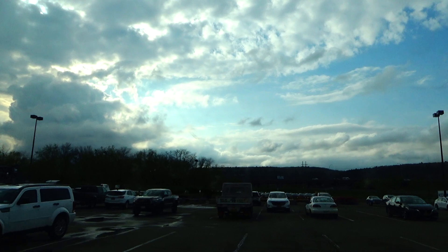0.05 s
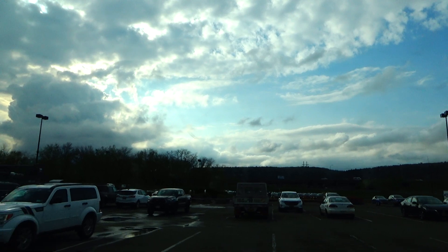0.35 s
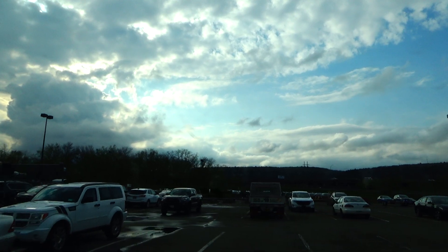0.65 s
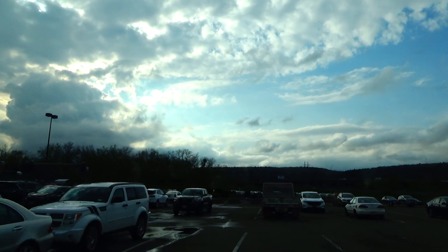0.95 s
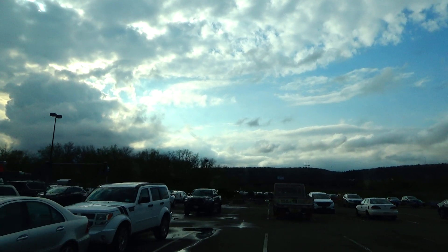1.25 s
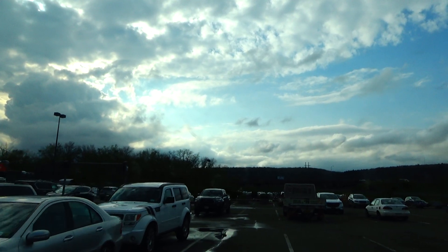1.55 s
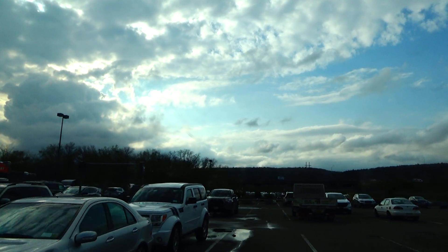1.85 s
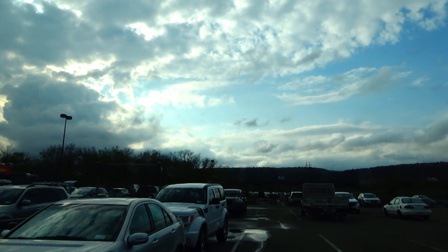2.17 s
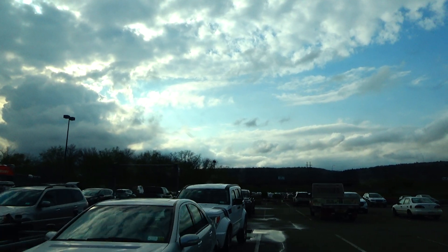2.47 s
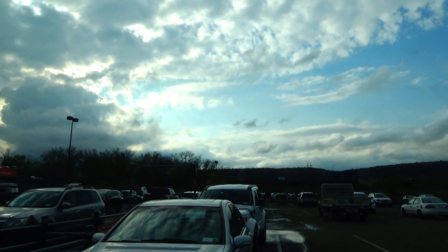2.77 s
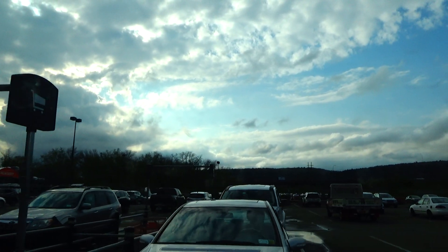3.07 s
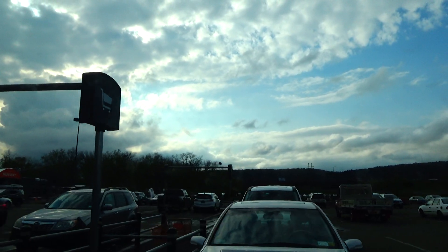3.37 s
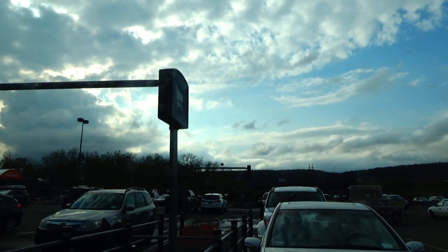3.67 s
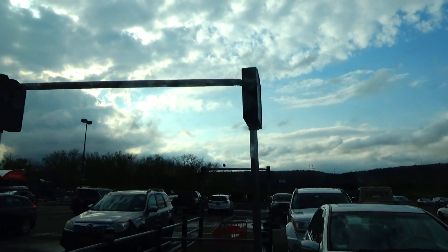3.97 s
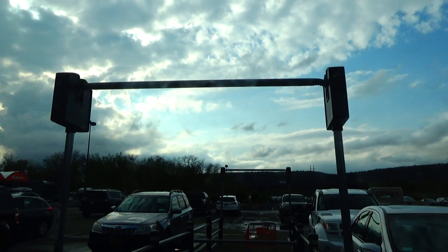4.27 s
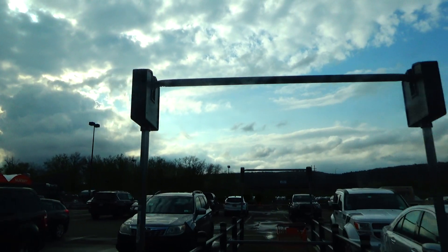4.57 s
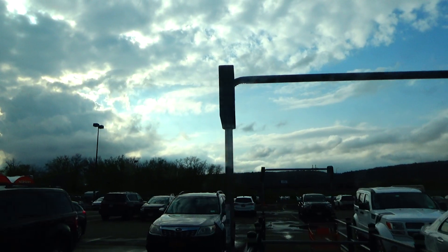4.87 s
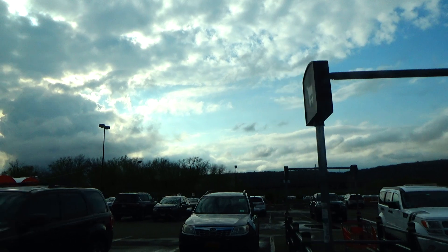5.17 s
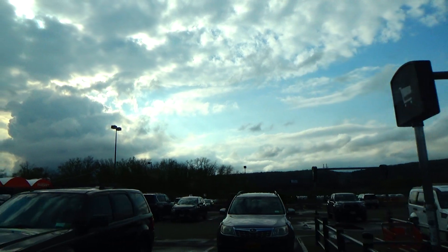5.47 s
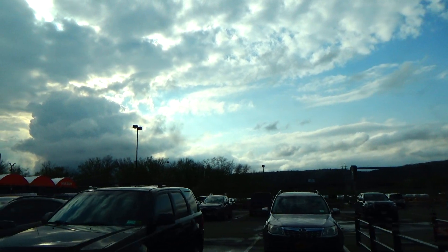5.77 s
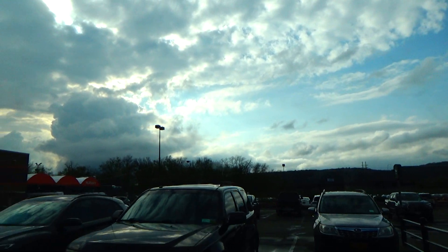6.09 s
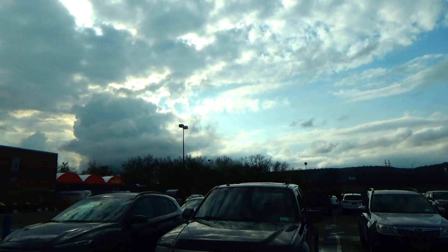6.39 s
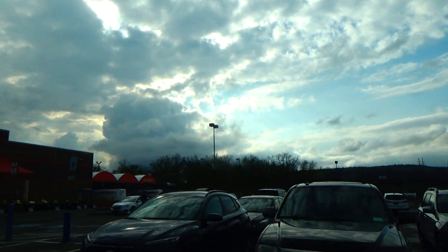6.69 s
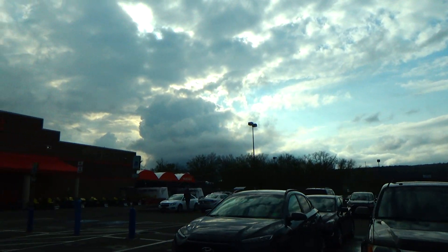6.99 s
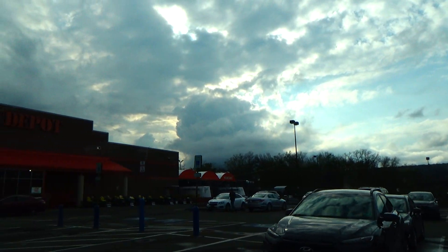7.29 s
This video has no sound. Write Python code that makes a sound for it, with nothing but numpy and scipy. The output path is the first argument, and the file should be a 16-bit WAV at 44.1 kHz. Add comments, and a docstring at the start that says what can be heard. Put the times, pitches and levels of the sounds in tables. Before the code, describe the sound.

A car rolls slowly over uneven asphalt, heard from inside: low road rumble and engine hum, with dull bumps and light plastic clacks.

```python
"""Inside a car rolling slowly across a parking lot.
Tyres on uneven asphalt shake the cabin's air modes over a low engine hum and a faint hiss.
Bumps make the body boom and heave on its springs; jolts set a trim panel droning.
Close by, loose plastic clacks and scrapes, a small catch ticks, and cloth rustles now and then."""
import sys
import numpy as np
from scipy import signal
from scipy.fft import rfft, irfft, next_fast_len
from scipy.io import wavfile

SR = 44100
rng = np.random.default_rng(int(sys.argv[2]) if len(sys.argv) > 2 else 0)


def master_out(mix):
    """Clip the mix to full scale and print it as 16-bit PCM to the path in sys.argv[1]."""
    frames = np.transpose(np.atleast_2d(mix))
    ceiling = np.clip(frames, -1, 1)
    pcm = np.round(ceiling * 32767).astype(np.int16)
    wavfile.write(sys.argv[1], SR, pcm)


N = 323694
TIME_S, BINS_HZ = np.arange(N) / SR, np.fft.rfftfreq(N, 1 / SR)


# rumble along the way: t/s, level/dB
ROAD_LEVEL = [(0, -24.5), (.55, -28), (.66, -30), (1.0, -28.5), (1.2, -28), (1.5, -30), (1.75, -34.5),
              (2.15, -36.5), (2.35, -34), (2.6, -33.5), (3.3, -32), (3.5, -37.5), (3.65, -33),
              (4.25, -28.5), (4.48, -34), (4.6, -36), (5.2, -29), (5.75, -32.5), (6.2, -27.5), (6.75, -28),
              (7.34, -30)]
# bumps lifting the rumble: t/s, level/dB, rise/s, fall/s
BUMPS = [(.8, -24.5, 0.064, 0.12), (4.62, -26, 0.034, 0.088), (4.98, -24.5, 0.09, 0.022)]
# body rumble: f/Hz, level/dB
RUMBLE_SPECTRUM = [(9, -44), (18, -4), (45, -13), (60, -3.5), (90, -5), (112, -8), (146, -13.5),
                   (200, -16.5), (330, -30.5), (700, -70)]
# tyre roar: f/Hz, level/dB
ROAR_SPECTRUM = [(70, -42), (160, 0), (207, -2), (260, 1.5), (350, -5), (500, -7), (700, -11), (930, -13),
                 (1080, -18), (1700, -25), (2500, -31.5), (4000, -39), (9000, -56)]
# air, panel and tyre resonances, plus a narrow engine hum line at 126 Hz: f/Hz, width/Hz, lift/dB
CABIN_MODES = [(43, 8.8, 1), (88.2, 28, 5), (126, 1.2, 0.5), (160, 35, 1.5), (178.8, 9.7, 4.5),
               (255, 34, 3), (284, 40, 2.5), (442, 6.5, 8.5), (655, 28, 6), (865, 15, 3), (1302, 40, 6)]

def road(rumble_db=-0.24, roar_db=-30.5, roar_follows=0.16, lumpy_db=1.09):
    """Uneven asphalt shakes the body; the tyres' roar follows only a little. Both ring the cabin."""
    cabin_db = resonance_db(CABIN_MODES, BINS_HZ)
    smooth_db = np.interp(TIME_S, *np.transpose(ROAD_LEVEL))
    surface_db = 20 * np.log10(np.hypot(amp(smooth_db), swells(BUMPS)))
    rumble = cabin_noise(lookup(RUMBLE_SPECTRUM) + cabin_db)
    roar = cabin_noise(lookup(ROAR_SPECTRUM) + cabin_db)
    roar_gain = amp(roar_follows * surface_db + roar_db + lumpy_db * drift(rate_hz=14.7))
    return rumble * amp(surface_db + rumble_db) + roar * roar_gain


# body booms and low knocks under the louder clacks: t/s, level/dB, f/Hz, swell/s, decay/s
THUMPS = [(-.012, -9.5, 172.4, 0.0096, 0.019), (.01, -23, 371, .012, 0.0069),
          (0.209, -21, 125, 0.013, 0.012), (0.733, -32, 450, 0.0049, 0.025),
          (.799, -16.5, 89, 0.036, 0.015), (1.539, -33.5, 720, 0.0055, .005),
          (1.539, -22.5, 110, 0.015, 0.015), (2.447, -26.5, 393, 0.0091, .012),
          (2.978, -25, 62, 0.017, .009), (4.22, -11.5, 170.8, 0.024, 0.021),
          (4.285, -23.5, 440, 0.0031, 0.0017), (4.443, -28, 312, 0.0029, 0.0055),
          (4.94, -38, 166, 0.049, 0.024), (5.475, -28.5, 465, 0.0083, 0.0029),
          (6.16, -28, 495, 0.0022, .012), (6.992, -33.5, 665, 0.0058, 0.028)]

def thumps(roughness=0.14, left_db=1.4):
    """Each jolt swells one boom of the body, which then dies away; the louder plastic knocks get a low, short
    boom of their own the same way."""
    out, t = np.zeros((2, N)), np.arange(SR // 2) / SR
    for start_s, db, hz, swell_s, decay_s in THUMPS:
        rising = np.sin(np.pi / 2 * t / swell_s) ** 2
        falling = np.exp(-np.maximum(t - swell_s, 0) / decay_s)
        envelope = np.where(t < swell_s, rising, falling)
        band = signal.butter(2, [hz / 2, hz * 2], "bandpass", fs=SR, output="sos")
        grit = unit(signal.sosfilt(band, rng.standard_normal((2, len(t)))))
        boom = np.sin(2 * np.pi * hz * t) + roughness * grit
        add(out, start_s, amp(db) * envelope * boom * amp([[left_db], [-left_db]]))
    return out


# body heaves: t/s, level/dB, rise/s, fall/s
HEAVES = [(.76, -23, 0.018, 0.12), (4.62, -29.5, 0.048, .1), (5.52, -27.5, 0.068, 0.17)]
# deep thud: f/Hz, level/dB
HEAVE_SPECTRUM = [(10, -18), (22, 11), (32, -10.5), (50, -11.5), (80, -19), (200, -63.5)]

def heave():
    """A dip in the asphalt rocks the whole body on its springs: a deep thud."""
    return cabin_noise(lookup(HEAVE_SPECTRUM)) * swells(HEAVES)


# panel jolts: t/s, level/dB, rise/s, fall/s
PANEL_JOLTS = [(.015, -26, 0.05, 0.11), (.41, -26, 0.014, 0.031), (.75, -25.5, .02, 0.021),
               (6.32, -28.5, 0.11, 0.13)]

def panel(mode_hz=272, half_width_hz=39):
    """A trim panel drones roughly in its one resonance when the road jolts it."""
    spectrum_db = -20 * np.log10(1 + ((BINS_HZ - mode_hz) / half_width_hz) ** 2)
    return cabin_noise(spectrum_db) * swells(PANEL_JOLTS)


# plastic contacts: t/s, level/dB, brightness/dB, hollowness/dB
CLACKS = [(.167, -41, 21, 0), (0.22, -34, 7, 18), (0.73, -28.5, -8, -9), (.742, -42, 4, 11),
          (1.3595, -36, -6, 0), (1.389, -42, 11, 3), (1.488, -39, -8, 2), (1.542, -31, -8, 2),
          (1.58, -42, -2, 0), (2.4487, -20, 2, 2), (2.456, -23, 4, -3), (2.4585, -23.5, 8, 12),
          (2.807, -35.5, -7, 4), (2.961, -30.5, 5, 7), (2.9902, -31, 4, -2), (3.855, -39, 7.5, -5),
          (4.058, -32.5, 2.5, 9), (4.15, -38.5, 10, 0), (4.2572, -27, 3.5, 7), (4.4465, -22.5, 0, 2),
          (4.653, -37, 14, 0), (4.969, -33, 0, -4), (5.143, -37, -7, 8), (5.154, -38, 5, -3),
          (6.1609, -15.5, -3, -2), (6.181, -23, 1.5, -1), (6.198, -35, 0, -2), (6.519, -31.5, 1, 8),
          (6.971, -37, 14, -2), (7.001, -32.5, -9, 1), (7.077, -44, 18, 0), (7.116, -40, 9, 2)]
# broad shape of a clack: f/Hz, level/dB
CLACK_SPECTRUM = [(100, 8.5), (330, 14), (750, 4), (1150, 2), (1600, 4.5), (2300, 3.5), (3200, 2),
                  (6200, -2.5), (7800, -12.5), (9700, -15.5), (11200, -20), (12500, -24), (15700, -50)]
# plastic resonances: f/Hz, width/Hz, lift/dB
PLASTIC_MODES = [(1425, 60, 5), (1556, 60, 6), (1660, 80, 6), (1893, 70, 8), (2840, 60, 6), (3000, 120, 7),
                 (4085, 70, 6), (4875, 100, 5), (5070, 70, 4), (5328, 60, 5), (5660, 80, 6), (5862, 90, 3)]
# brightness tilt: f/Hz, weight
BRIGHT_WEIGHT = [(1200, -0.69), (3000, 0.43), (6200, 1.28), (8800, 2.12)]
# hollow midrange: f/Hz, weight
HOLLOW_WEIGHT = [(450, 0.28), (800, 1), (1700, 0.78), (2300, 0.1)]

def clacks(gain_db=2.5, detune=0.0032):
    """Loose plastic knocks; harder contacts are brighter, and each new contact spot shifts the ring."""
    out, hz = np.zeros((2, N)), np.fft.rfftfreq(4096, 1 / SR)
    for start_s, db, bright_db, hollow_db in CLACKS:
        shift = 1 + detune * rng.uniform(-0.34, 0.68)
        plastic_db = lookup(CLACK_SPECTRUM, hz) + resonance_db(PLASTIC_MODES, hz * shift)
        contact_db = bright_db * lookup(BRIGHT_WEIGHT, hz) + hollow_db * lookup(HOLLOW_WEIGHT, hz)
        ring = minimum_phase(plastic_db + contact_db)
        ring /= abs(ring).max()
        add(out, start_s, amp(db + gain_db) * signal.fftconvolve(reflections(), ring[None], axes=1))
    return out


# snaps of the catch: t/s, level/dB
TICKS = [(0.4718, -30.5), (2.689, -26)]
# its modes: f/Hz, level/dB, t60/s
CATCH_MODES = [(2090, 8, 0.0075), (2110, -12, 0.021), (2500, -7, 0.02), (3720, -7, 0.0059),
               (6340, -3, 0.0072)]

def ticks(left_db=2.0):
    """A small catch snaps and rings briefly, a little to the left."""
    out, t = np.zeros((2, N)), np.arange(SR // 16) / SR
    ring = sum(amp(db) * decay(t, t60_s) * np.sin(2 * np.pi * hz * t) for hz, db, t60_s in CATCH_MODES)
    ring /= abs(ring).max()
    for start_s, db in TICKS:
        add(out, start_s, amp(db) * ring * amp([[left_db], [-left_db]]))
    return out


# short slides: t/s, level/dB, rise/s, fall/s
SCRAPES = [(.742, -34.5, 0.011, 0.018), (.785, -38, .016, 0.021), (4.958, -47, 0.025, .015),
           (6.55, -49, .03, .08)]
# sliding grit: f/Hz, level/dB
SCRAPE_SPECTRUM = [(250, -15), (700, 9), (1300, 0), (2800, -15), (4200, -22), (9000, -32), (15000, -60)]

def scrapes():
    """Loose things slide a little, with a dull grit."""
    return friction(SCRAPE_SPECTRUM) * swells(SCRAPES)


# cloth strokes: t/s, level/dB, rise/s, fall/s
CLOTH_STROKES = [(.745, -49.5, .005, 0.022), (.825, -53.5, 0.037, 0.14), (1.02, -54, 0.046, 0.024),
                 (1.39, -58, .02, .03), (1.605, -58.5, 0.046, 0.025), (2.17, -59, .04, 0.036),
                 (2.982, -51, 0.018, 0.016), (3.26, -57.5, 0.048, 0.046), (3.92, -59, 0.034, 0.043),
                 (4.1, -57.5, 0.035, 0.077), (4.415, -52.5, 0.06, 0.15), (4.935, -48.5, 0.14, 0.07),
                 (5.14, -54.5, 0.082, 0.06), (5.6, -57, 0.42, 0.43), (6.2, -55.5, 0.1, 0.45),
                 (6.503, -47, .007, .008), (6.546, -48, .007, 0.016), (6.575, -49, 0.015, 0.03),
                 (6.638, -46.5, 0.0097, 0.011), (6.676, -48.5, 0.013, 0.017), (6.74, -50, 0.019, 0.032),
                 (6.95, -59, 0.12, 0.062)]
# rubbing cloth: f/Hz, level/dB
CLOTH_SPECTRUM = [(200, -24), (600, 21), (1300, 14), (2600, 11.5), (4200, 2), (6700, 7.5), (8400, 2),
                  (10000, 1), (12300, -7), (14000, -18), (15700, -30)]

def rustle(gain_db=5.5, clump_db=1.64):
    """Cloth rubs in uneven strokes."""
    return friction(CLOTH_SPECTRUM) * swells(CLOTH_STROKES) * amp(clump_db * drift(rate_hz=54) + gain_db)


# engine hum: multiple of the firing rate, level/dB
ENGINE_ORDERS = [(1, -42), (2, -39.5), (3, -41), (6, -61.5)]

def engine(firing_hz=42.34, waver=0.01965, throb_db=2.5):
    """Near idle, low orders of the firing rate hum, each swelling a little on its own."""
    cycles = np.cumsum(firing_hz * (1 + waver * drift(rate_hz=6.0))) / SR
    hum = np.zeros(N)
    for order, db in ENGINE_ORDERS:
        gain = amp(db + throb_db * drift(rate_hz=1.26))
        hum += gain * np.sin(2 * np.pi * (order * cycles + rng.random()))
    return np.sqrt(2) * hum * amp([[.7], [-.7]])


# steady hiss: f/Hz, level/dB
HISS_SPECTRUM = [(800, 2), (2500, 2), (4500, 2), (6600, 5), (8300, 2.5), (9700, 1.5), (12000, -2),
                 (15700, -4)]

def hiss(level_db=-61.5):
    """An even, faint hiss."""
    return amp(level_db) * cabin_noise(lookup(HISS_SPECTRUM))


def friction(spectrum, slips_per_s=11000, snags_per_s=60, snag_s=0.0056, snag_depth=2.8, folds=8):
    """Thousands of tiny slips; each fold of the surface snags and lets go, crackling in its own band."""
    n_fft = next_fast_len(N)
    hz, t = np.fft.rfftfreq(n_fft, 1 / SR), np.arange(SR // 20) / SR
    slips = (rng.random(N) < slips_per_s / SR) * rng.standard_normal((2, N))
    slip_bins = rfft(diffuse(lookup(spectrum), slips), n_fft)
    folds_hz = np.linspace(800, 12800, folds)
    release = np.exp(-t / snag_s) - np.exp(-10 * t / snag_s)
    out = np.zeros((2, N))
    for fold in np.eye(folds):
        snags = (rng.random(N) < snags_per_s / SR) * rng.uniform(0.19, 1, N)
        bursts = signal.oaconvolve(snags, release)[:N]
        band = irfft(slip_bins * np.interp(hz, folds_hz, fold), n_fft)[:, :N]
        out += band * unit(1 + snag_depth * bursts)
    return out


def reflections(glass_s=0.0029, glass_gain=0.73, dash_db=3.5, tail_db=-10, spread=0.55):
    """Direct sound, the windscreen's strong echo, a quick scatter off the dashboard and a short tail."""
    t = np.arange(SR // 8) / SR
    scatter = rng.standard_normal(len(t)) + spread * rng.standard_normal((2, len(t)))
    dashboard = amp(dash_db) * unit(decay(t, t60_s=.025))
    tail = amp(tail_db) * unit(decay(t, t60_s=.1))
    taps = scatter * (dashboard + tail) / np.sqrt(len(t))
    taps[:, 0] += 1
    taps[:, round(glass_s * SR)] += glass_gain
    return taps


# left-right likeness: f/Hz, correlation
COHERENCE = [(30, 0.86), (85, 0.98), (170, 0.64), (340, 0.37), (700, 0.27), (1400, 0.3), (3000, 0.46),
             (6000, 0.69), (11000, 0.96), (14000, .995)]
# left minus right: f/Hz, level/dB
BALANCE = [(40, 2.2), (170, 1.5), (330, 0.5), (700, 0.1), (2000, 0.5), (12000, 0)]

def diffuse(spectrum_db, drive):
    """Colours two random drives and spreads them left and right as the cabin does; mono rms 1."""
    coherence = lookup(COHERENCE)
    mid, side = rfft(drive) * amp(spectrum_db) * np.sqrt([1 + coherence, 1 - coherence])
    left_db = lookup(BALANCE) / 2
    pair = irfft(np.array([(mid + side) * amp(left_db), (mid - side) * amp(-left_db)]), N)
    return pair / pair.mean(0).std()


def cabin_noise(spectrum_db):
    """Steady coloured noise, diffuse in the cabin."""
    return diffuse(spectrum_db, rng.standard_normal((2, N)))


def swells(events):
    """Gain of events that rise to a peak at their time and fall away; powers add."""
    power = np.zeros(N)
    for peak_s, db, rise_s, fall_s in events:
        nepers = np.maximum((peak_s - TIME_S) / rise_s, (TIME_S - peak_s) / fall_s)
        power += amp(db) ** 2 * np.exp(-2 * nepers)
    return np.sqrt(power)


def minimum_phase(spectrum_db):
    """Impulse response with this spectrum, ringing only after the blow."""
    log_gain = np.concatenate([spectrum_db, spectrum_db[-2:0:-1]]) * np.log(10) / 20
    phase = -signal.hilbert(log_gain).imag[:len(spectrum_db)]
    return irfft(amp(spectrum_db) * np.exp(1j * phase))


def resonance_db(modes, hz):
    """Summed lift of resonance peaks."""
    return sum(db / (1 + (2 * (hz - mode_hz) / width_hz) ** 2) for mode_hz, width_hz, db in modes)


def lookup(table, hz=BINS_HZ):
    """Interpolates on a log-frequency axis."""
    table_hz, values = np.transpose(table)
    return np.interp(np.log(hz + 1), np.log(table_hz + 1), values)


def drift(rate_hz):
    """Smooth random wander, rms 1."""
    return unit(irfft(rfft(rng.standard_normal(N)) * np.exp(-(BINS_HZ / rate_hz) ** 2), N))


def decay(t, t60_s):
    """Falls 60 dB in t60_s."""
    return np.exp(-np.log(1000) * t / t60_s)


def amp(db):
    """Decibels to gain."""
    return 10 ** (np.asarray(db) / 20)


def unit(x):
    """Scales to rms 1."""
    return x / np.sqrt(np.mean(x ** 2) + 1e-20)


def add(mix, start_s, sound):
    """Mixes in a stereo sound at start_s."""
    start = round(start_s * SR)
    sound = sound[:, max(-start, 0):]
    part = mix[:, max(start, 0):][:, :sound.shape[1]]
    part += sound[:, :part.shape[1]]


def scene():
    """Everything heard from the front seat."""
    car = road() + heave() + panel() + engine() + hiss()
    return car + rustle() + scrapes() + thumps() + clacks() + ticks()


def record(dry, cutoff_hz=15780):
    """Steep low-pass."""
    taps = signal.firwin(801, cutoff_hz, window=("kaiser", 9), fs=SR)
    return signal.oaconvolve(dry, taps[None], "same")


dry = scene()
out = record(dry)
master_out(out)
```